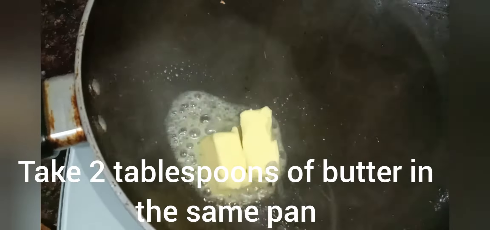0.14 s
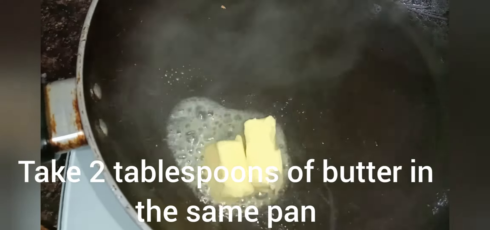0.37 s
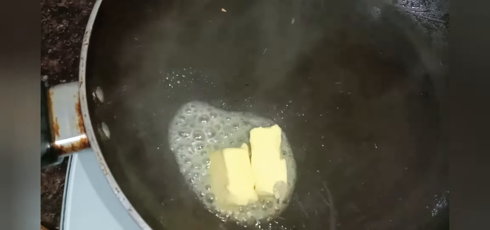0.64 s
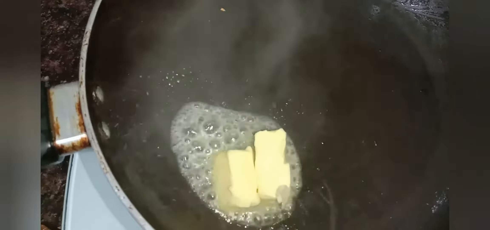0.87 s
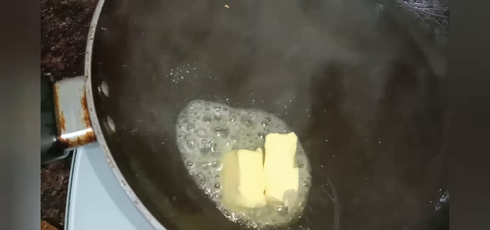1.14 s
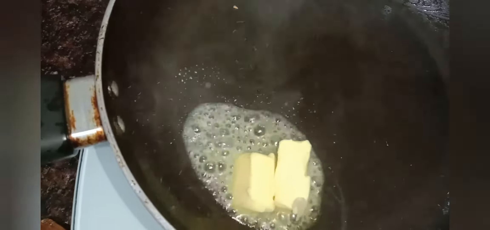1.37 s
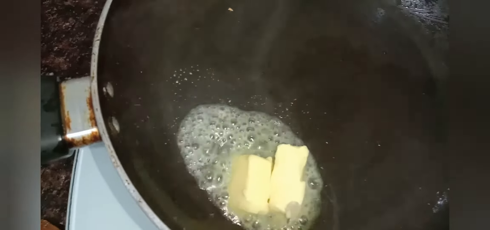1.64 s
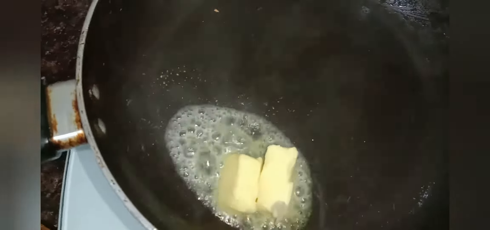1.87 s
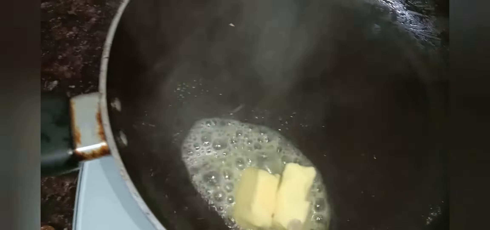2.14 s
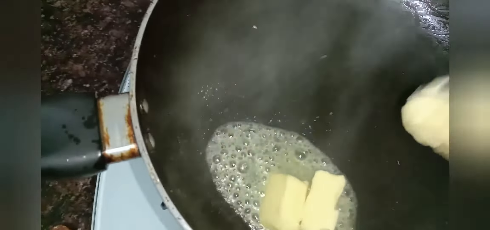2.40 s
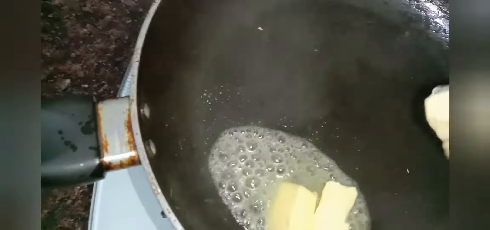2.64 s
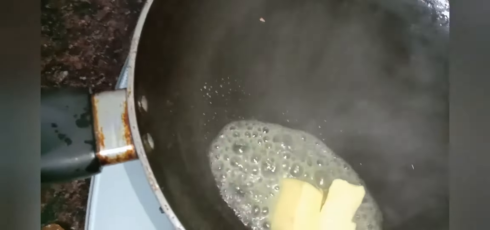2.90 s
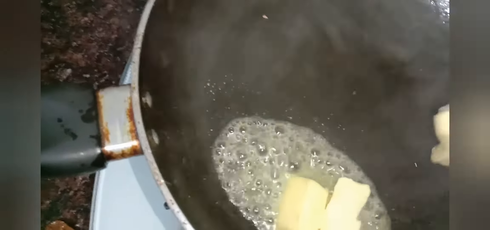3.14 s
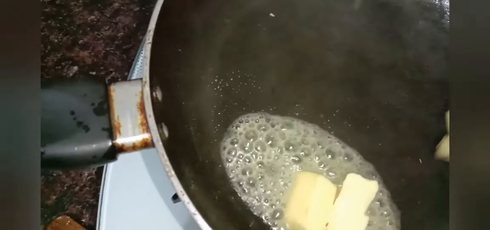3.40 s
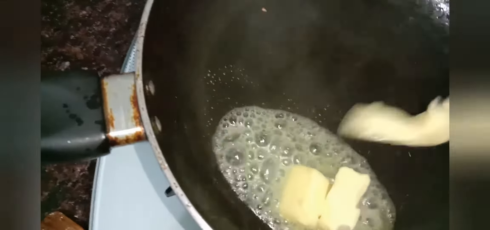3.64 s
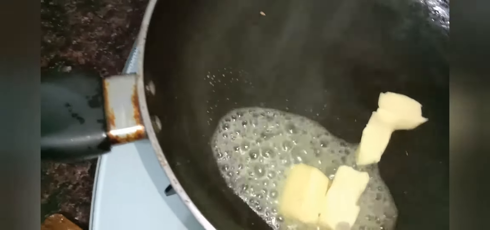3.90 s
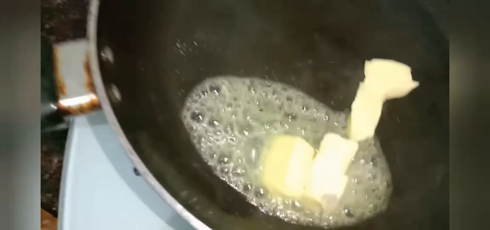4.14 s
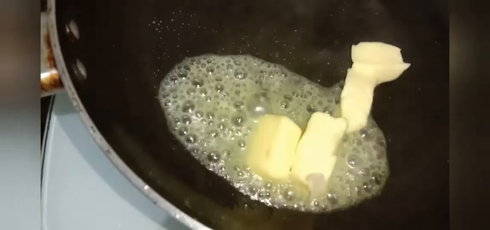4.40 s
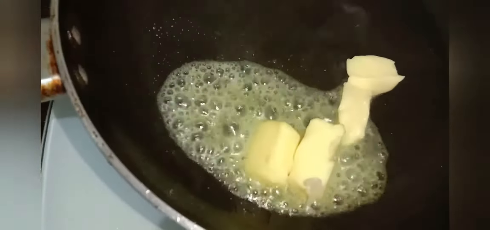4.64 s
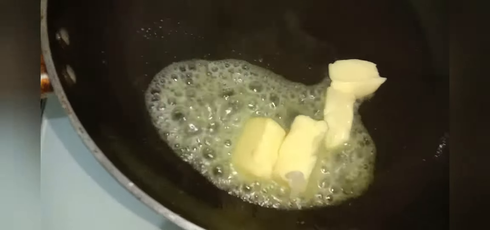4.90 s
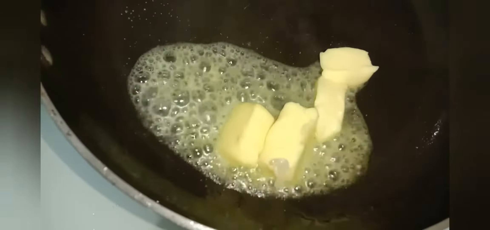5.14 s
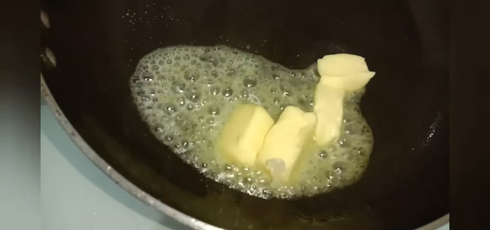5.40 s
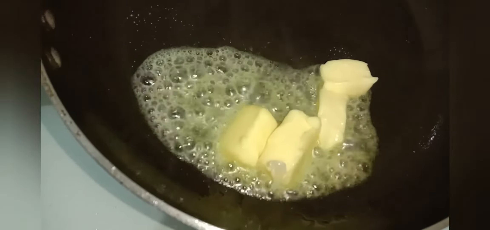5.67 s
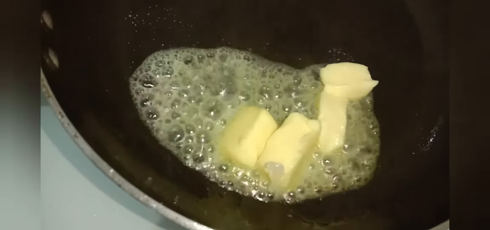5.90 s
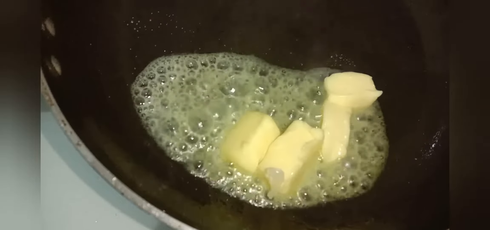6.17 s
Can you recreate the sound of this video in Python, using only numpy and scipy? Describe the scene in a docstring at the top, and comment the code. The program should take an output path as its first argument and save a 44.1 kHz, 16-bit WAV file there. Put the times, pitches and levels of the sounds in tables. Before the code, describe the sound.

Continuous fizzy frying of melting butter, close and mono, with irregular short chirpy pops and clicks bouncing off the pan wall. Early on something hard is knocked twice nearby, each with a brief roomy tail, then two muffled bumps follow quickly. Afterwards only sizzling and popping remain, strongest around the middle, then slightly lower and more bubbly. Very quiet household rumble lies underneath.

```python
"""Butter foams in a hot steel pan in a kitchen, one small microphone held close above it. Thousands of steam
bubbles ring at the pitch of their size each second, over a hiss of vapour; larger ones pop as short wave
packets and bubble skins snap without pitch. Something hard is knocked twice nearby, struck modes with a dying
wash, then two dull bumps follow. Behind it a faint household rumble of low noise wavers in the room resonances,
with brief low tones swelling here and there, a few beside the soft bumps."""
import sys
import numpy as np
from scipy import signal
from scipy.fft import rfft, irfft
from scipy.io import wavfile

SR = 44100
rng = np.random.default_rng(int(sys.argv[2]) if len(sys.argv) > 2 else 0)


def volts_from_db(level):
    """Convert decibel levels to linear amplitude ratios."""
    exponent = np.asarray(level, float) / 20
    return 10 ** exponent


def inscribe(sig):
    """Save sig as 16-bit PCM at rate SR to the path in sys.argv[1].

    A 1-D sig is mono; a 2-D sig holds one channel per row.
    Samples are clipped to [-1, 1] before scaling.
    """
    pcm = np.round(np.clip(np.atleast_2d(sig).T, -1, 1) * 32767)
    wavfile.write(sys.argv[1], SR, pcm.astype(np.int16))


N = 277151  # samples

# peaks and dips of the pan bowl and microphone port: (f/Hz, width/Hz, level/dB)
PAN_PEAKS = [(1276, 125, 9), (1804, 220, -4), (2100, 107, 3), (3430, 580, 2.5), (4390, 370, -3),
             (5660, 470, 2), (6117, 457, -9.5), (6100, 167, 8), (8106, 990, -6.5)]


def rms_one(x):
    """Scales a signal to an rms of 1."""
    return x / np.sqrt(np.mean(x ** 2) + 1e-20)


def in_time(rows):
    """Draws each column of a table as a curve over time, straight between the rows."""
    s, *columns = np.transpose(rows)
    return [np.interp(np.arange(N) / SR, s, column) for column in columns]


def drift(per_s):
    """Slow chance of spread 1: coarse noise through a double one-pole low-pass."""
    coarse_step = 20  # samples
    r = np.exp(-2 * np.pi * per_s * coarse_step / SR)
    noise = rng.standard_normal(N // coarse_step + 3002)
    slow = signal.lfilter([1], [1, -2 * r, r * r], noise)[3000:]  # leave out the filter's start
    return np.interp(np.arange(N) / coarse_step, np.arange(len(slow)), rms_one(slow - slow.mean()))


def resonate(x, hz, width_hz):
    """Two-pole resonance with gain 1 on top."""
    r = np.exp(-np.pi * width_hz / SR)
    poles = [1, -2 * r * np.cos(2 * np.pi * hz / SR), r * r]
    return signal.lfilter([(1 - r * r) / 2, 0, (r * r - 1) / 2], poles, x)


def colour(x, spectrum, peaks=()):
    """Causal (minimum phase) filter from a broad spectrum and bell-shaped peaks or dips."""
    hz = np.maximum(np.fft.rfftfreq(4096, 1 / SR), 1)
    points_hz, points_db = np.transpose(spectrum)
    level_db = np.interp(np.log(hz), np.log(points_hz), points_db)
    for centre_hz, width_hz, db in peaks:
        level_db = level_db + db / (1 + (2 * (hz - centre_hz) / width_hz) ** 2)
    # folding the cepstrum onto positive time gives minimum phase
    cepstrum = irfft(np.log(volts_from_db(level_db)))
    cepstrum[1:2048] *= 2
    cepstrum[2049:] = 0
    response = irfft(np.exp(rfft(cepstrum)))
    return signal.fftconvolve(x, response)[:N]


def bursts(per_s, spread_db):
    """Random clicks, most small, a few large, either sign."""
    sizes = volts_from_db(spread_db * np.minimum(rng.exponential(1, N), 4.2))
    signs = rng.choice([-1, 1], N)
    happens = rng.random(N) < per_s / SR
    return sizes * signs * happens + 1e-18  # never quite zero, which keeps the filters fast


def packets(rows, second_db):
    """Bell-shaped wave packets (t/s, f/Hz, level/dB, length/s), each with a weaker unrelated companion pitch."""
    out = np.zeros(N)
    for (s, hz, db, length), (ratio, turn) in zip(rows, rng.random((len(rows), 2))):
        first = max(round((s - 2 * length) * SR), 0)
        at = np.arange(first, min(round((s + 2 * length) * SR), N))
        age = at / SR - s
        phase = 2 * np.pi * hz * age
        companion = volts_from_db(second_db) * np.sin(phase * (0.598 + 0.914 * ratio))
        wave = np.sin(phase + 2 * np.pi * turn) + companion
        bell = np.exp(-np.log(16) * (age / length) ** 2)  # length runs between the half-height points
        out[at] += volts_from_db(db) * bell * wave
    return out


def rumble():
    """Household rumble: low noise in room resonances that each waver alone, a broad bed, brief low tones."""
    # level of the room resonances together: (t/s, level/dB)
    modes_level = [(0.0, -55), (1.0, -56.5), (1.5, -55), (2.0, -58.5), (2.76, -57.5), (3.6, -60.5),
                   (4.39, -54), (4.65, -58), (5.0, -54.5), (6.28, -56)]
    # room resonances: (f/Hz, width/Hz before widening, level/dB before wavering)
    room_modes = [(101.6, 15, -9.5), (130, 49, -12.5), (224.5, 31, -3.5), (308.6, 43, -1), (428, 62, -6),
                  (507, 57, -10), (603, 6.8, -7)]
    # colour of the broad bed: (f/Hz, level/dB per Hz)
    bed_spectrum = [(25, -46), (60, -2.5), (120, 3.5), (250, 4), (500, -27), (1000, 6.5), (2000, -37)]
    # brief low tones swelling in the rumble, a few of them beside the soft bumps (1.5 to 1.65 s): (t/s at the
    # peak, f/Hz, level/dB, length/s)
    low_tones = [(0.37, 109.3, -57.5, 0.23), (0.63, 231, -58, 0.1), (0.69, 311, -48.5, 0.057),
                 (1.4, 230, -48.5, 0.16), (1.47, 136, -58.5, 0.32), (1.57, 460, -49, 0.034),
                 (1.59, 600, -53, 0.14), (1.63, 228, -46, 0.036), (1.63, 618, -48, 0.044),
                 (4.26, 205, -53.5, 0.069), (5.02, 222, -53, 0.04), (5.23, 240, -52, 0.065),
                 (5.39, 412, -52, 0.048), (6.0, 274, -52.5, 0.064), (6.11, 289, -50, 0.04)]
    bed = rms_one(colour(rng.standard_normal(N), bed_spectrum))
    bed_db = -66.5 + 3.5 * drift(0.5)
    modes = 0
    for hz, width_hz, db in room_modes:
        noise = rng.standard_normal(N) * volts_from_db(db + 3.96 * drift(11.4))
        wide_hz = width_hz * 1.9  # two passes narrow the peak
        modes = modes + resonate(resonate(noise, hz, wide_hz), hz, wide_hz)
    modes_db, = in_time(modes_level)
    return volts_from_db(modes_db) * rms_one(modes) + volts_from_db(bed_db) * bed + packets(low_tones, second_db=-6.5)


def knocks():
    """Every contact strikes all modes with its own strength; the kitchen answers with a dying wash."""
    # knocks and soft bumps: (t/s, level/dB, contact cut-off f/Hz; a soft contact is dull)
    blows = [(0.2559, -12, 4230), (1.3609, -13.5, 3600), (1.548, -21.5, 706), (1.607, -21.5, 830)]
    # how a knock lands and comes back from near surfaces: (delay/s, level/dB)
    contacts = [(0, 0), (.0017, 0), (.0032, -3), (.0075, -11), (.012, -8), (.0185, -11)]
    # ringing of the knocked object: (f/Hz, level/dB, time to fall 60 dB/s)
    object_modes = [(320, -23, 0.059), (409, -16.5, 0.034), (595, -29, 0.054), (1087, -18.5, 0.045),
                    (1240, -22, 0.029), (1420, -12.5, 0.024), (1780, -9.5, 0.014), (2340, -10.5, 0.016),
                    (2880, -14, 0.011), (3200, -11, 0.0093), (3400, -21, 0.011)]
    tail_db, tail_t60_s = -16.5, 0.4
    out, t = np.zeros(N), np.arange(N) / SR
    echoes = bursts(3200, spread_db=1.5)  # separate returns from walls and cupboards
    wash = rms_one(resonate(resonate(echoes, 670, 2800), 670, 2800))
    for s, db, cut_hz in blows:
        age = np.maximum(t - s, 0)
        onset = 1 - np.exp(-age / 0.0016)
        blow = wash * onset * volts_from_db(tail_db - 60 * age / tail_t60_s)
        for hz, mode_db, t60 in object_modes:
            clicks = np.full(N, 1e-18)
            for lag_s, contact_db in contacts:
                strength_db = contact_db + mode_db + rng.normal(0, 2)
                clicks[round((s + lag_s) * SR)] = -volts_from_db(strength_db)
            r, w = volts_from_db(-60 / (t60 * SR)), 2 * np.pi * hz / SR
            blow += signal.lfilter([0, np.sin(w)], [1, -2 * r * np.cos(w), r * r], clicks)
        contact_filter = signal.butter(4, cut_hz, fs=SR, output="sos")
        out += volts_from_db(db) * signal.sosfilt(contact_filter, blow)
    # the microphone picks up little bass from the knocks
    bass_cut = signal.butter(4, 230, "high", fs=SR, output="sos")
    return signal.sosfilt(bass_cut, out)


def in_pan(x):
    """The steep pan wall and the stove top send each burst back within milliseconds."""
    out = x.copy()
    for lag_s, db in [(.0008, -14), (.0019, -35), (.0034, -8.5), (.0062, -38)]:
        lag = round(lag_s * SR)
        out[lag:] += volts_from_db(db) * x[:-lag]
    return out


def snaps():
    """A film tears: one click, broad in pitch and lifted at the top by the microphone port."""
    # loudest pitchless snaps of bubble skins: (t/s, peak level/dB before the pan's echoes)
    loud_snaps = [(0.709, -9.5), (0.947, -6), (1.354, -9), (1.6544, -9.5), (1.6932, -19), (3.3331, -5),
                  (3.4688, -14), (4.024, -4), (4.245, -16), (4.3388, -16), (4.4071, -21), (4.8806, -15),
                  (4.9504, -8), (5.0332, -15)]
    # colour of a snap: (f/Hz, level/dB per Hz)
    snap_spectrum = [(60, -62), (400, -25), (1200, -4), (3000, 0), (6000, -5), (12000, -7), (14600, 5),
                     (16000, -3)]
    clicks = volts_from_db(-24) * bursts(3.0, spread_db=2.5)  # lesser snaps at random moments
    for s, db in loud_snaps:
        clicks[round(s * SR)] = volts_from_db(db)
    impulse = (np.arange(N) == 0).astype(float)
    shape = colour(impulse, snap_spectrum, PAN_PEAKS)[:2048]
    return signal.fftconvolve(clicks, shape / np.abs(shape).max())[:N]


def pops():
    """A big bubble bursts: a wave packet of about a millisecond; lesser ones ring a few cycles."""
    # loudest bursts: (t/s at the peak, level/dB, f/Hz, length/ms)
    loud_pops = [(0.1711, -12.5, 3300, 0.24), (0.344, -21, 5730, 0.76), (0.6, -14, 4800, 0.2),
                 (0.9428, -20, 4500, 0.91), (1.089, -18.5, 6030, 0.5), (1.354, -16, 5500, 0.4),
                 (1.5816, -13.5, 4700, 0.45), (1.6932, -10, 6500, 0.45), (1.7626, -14, 5420, 0.8),
                 (2.0461, -19, 5340, 1.4), (2.1592, -15.5, 5040, 0.82), (2.2969, -9, 6660, 0.45),
                 (2.3236, -16.5, 5700, 0.8), (2.341, -17, 7450, 0.7), (2.348, -16, 5300, 0.8),
                 (2.4176, -18, 9200, 0.64), (2.9225, -17, 4780, 0.7), (2.9357, -17, 7360, 0.62),
                 (2.9651, -20, 7440, 0.52), (3.1294, -15, 5500, 0.54), (3.3034, -16, 6850, 0.67),
                 (3.3649, -16, 4880, 0.3), (4.1777, -12, 5040, 0.33), (4.2624, -16.5, 5510, 1.3),
                 (4.3126, -15.5, 6360, 0.5), (4.326, -15.5, 6500, 0.9), (4.547, -19, 3780, 0.66),
                 (4.9504, -14, 6540, 0.2), (4.9773, -15.5, 5100, 0.81), (5.367, -16, 5450, 0.4),
                 (5.5002, -17, 5560, 0.8), (6.135, -13, 5500, 0.4)]
    count = 70  # lesser bursts at random moments
    when_s = rng.random(count) * N / SR
    size, pitch, ring = rng.standard_normal((3, count))
    pitch_hz = 5800 * 2 ** (.27 * pitch)  # spread in octaves
    level_db = -23 + 2.0 * size
    length_s = 3.5 * 2 ** (.5 * ring) / pitch_hz  # about 3.5 cycles
    small = np.transpose([when_s, pitch_hz, level_db, length_s])
    loud = [(s, hz, db, ms / 1000) for s, db, hz, ms in loud_pops]
    return packets(loud + list(small), second_db=-9)


def sizzle():
    """Each bubble rings at the pitch of its size, most for a few cycles, some longer; skins snap without pitch."""
    # foam: (t/s, sizzle level/dB before a lift, coarseness as the pool spreads, large bubbles' level/dB re sizzle)
    foam_course = [(0, -32.5, 0.2, 5.5), (.6, -33, 0.01, 2.5), (1.4, -32.5, 0.17, 3.5),
                   (1.84, -31.5, 0.1, 0.5), (2.5, -30.5, 0.24, 1), (3.36, -29, 0.34, 0),
                   (3.9, -28.5, 0.64, 1.5), (4.28, -29, 0.73, 3), (4.67, -29.5, 0.75, 1.5),
                   (5.4, -30.5, 1.04, 3), (6.28, -30.5, 1.06, 2)]
    # extra level of the lowest pitches, near and under 1 kHz: (t/s, level/dB)
    gurgle_course = [(0, 2), (2.5, 5.5), (4.2, 2.3), (6.28, -3)]
    # broad colour of the sizzle: (f/Hz, level/dB)
    sizzle_spectrum = [(300, -25), (700, -25.5), (1100, -17.5), (1900, -12), (2800, -9), (3700, -4.5),
                       (5300, 0), (7300, 0.5), (9300, -5.5), (11500, -13), (13900, -20.5)]
    # microphone port lift, continuing that colour upwards: (f/Hz, level/dB)
    port_spectrum = [(14250, -12.5), (14620, -8), (15000, -9), (15500, -9.5)]
    level_db, coarse, large_db = in_time(foam_course)
    gurgle_db, = in_time(gurgle_course)
    fine_db = 4.0 - 2.5 * coarse  # the finest bubbles fade as the foam coarsens
    middling_db = -1 + 5.5 * coarse  # bubbles near 4 kHz gain
    thickness = volts_from_db(2.0 * drift(25) + 2.0 * drift(150))  # bursts come thicker and thinner by chance
    clicks = bursts(8000 * thickness, spread_db=3.0)
    pitches = np.geomspace(600, 16000, num=36)  # Hz
    dealt = rng.integers(0, len(pitches), N)  # which pitch each click gets
    rings = 0
    for k, hz in enumerate(pitches):
        # share of each bubble size at this pitch, 0 to 1
        large = np.clip(np.log2(3600 / hz), 0, 1)
        fine = np.clip(np.log2(hz / 7500) * 2, 0, 1)
        middling = np.exp(-(np.log2(hz / 4100) / .2) ** 2)
        gurgle = np.clip(np.log2(1150 / hz) * 4, 0, 1)
        size_db = large * large_db + fine * fine_db + middling * middling_db + gurgle * gurgle_db
        patchy_db = (0.8 + 0.67 * large) * drift(7.4) + 1.65 * drift(11.7)  # patches of foam come and go
        steam = volts_from_db(-17.5) * rng.standard_normal(N)  # vapour hissing out between bubbles
        drive = volts_from_db(size_db + patchy_db) * (clicks * (dealt == k) + steam)
        short = resonate(resonate(drive, hz, 0.27 * hz), hz, 0.27 * hz)
        longer = resonate(short, hz, 0.03 * hz)
        rings = rings + short + volts_from_db(1.0) * longer
    cracks = bursts(500 * thickness, spread_db=3.5) * volts_from_db(fine_db)
    bright = signal.lfilter([1, -.6], [1], cracks)  # a snap is sharpest in the treble
    foam = rms_one(rings) + volts_from_db(-3.5) * rms_one(bright)
    coloured = colour(foam, sizzle_spectrum + port_spectrum, PAN_PEAKS)
    return volts_from_db(level_db + 2.0) * rms_one(coloured)


def scene():
    """Rumble and knocks around the pan, pops and snaps echoing in it, the sizzle on top; both channels alike."""
    mono = rumble() + knocks() + in_pan(pops() + snaps()) + sizzle()
    return np.stack([mono, mono])


def roll_off(x):
    """The treble ends steeply here."""
    return signal.sosfilt(signal.butter(12, 16860, fs=SR, output="sos"), x)


def record(dry):
    """One microphone on both channels, its top cut steeply at 15450 Hz."""
    top_cut = signal.ellip(12, .5, 75, 15450, fs=SR, output="sos")
    mix = signal.sosfilt(top_cut, dry)
    return roll_off(mix)


dry = scene()
out = record(dry)
inscribe(out)
```